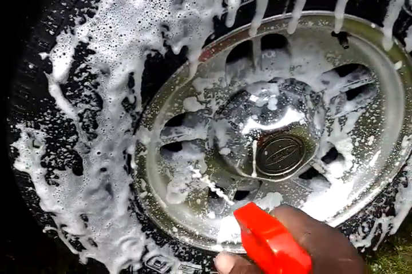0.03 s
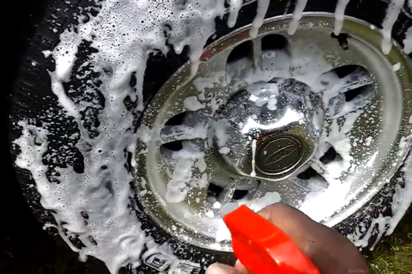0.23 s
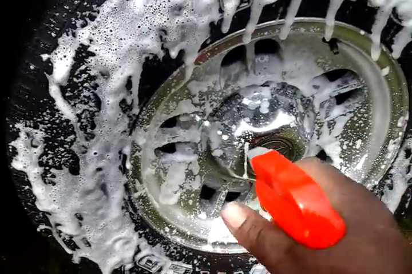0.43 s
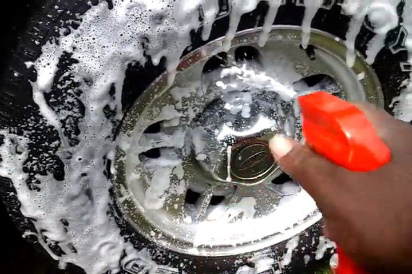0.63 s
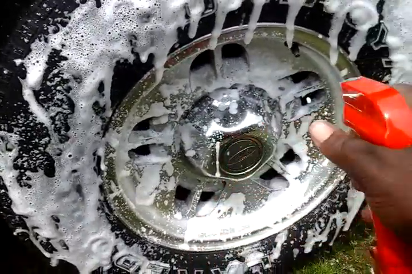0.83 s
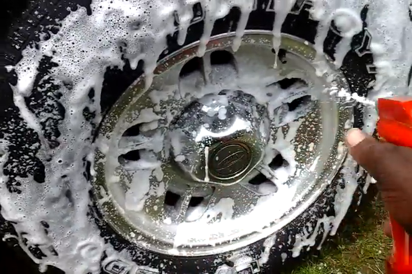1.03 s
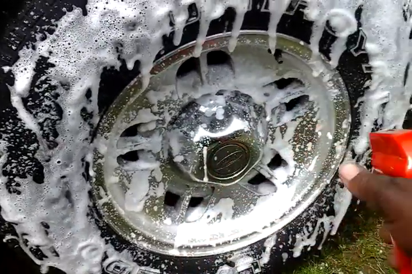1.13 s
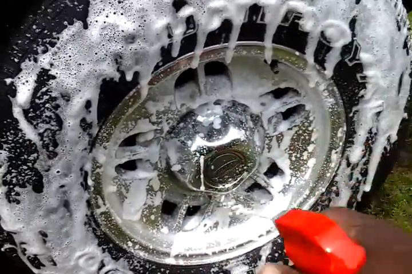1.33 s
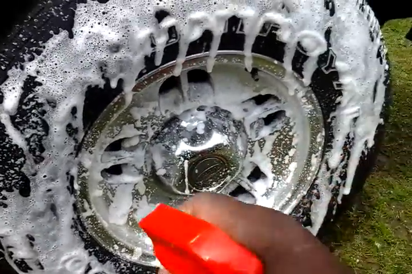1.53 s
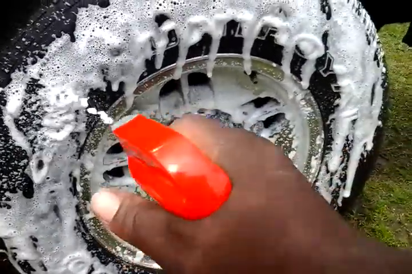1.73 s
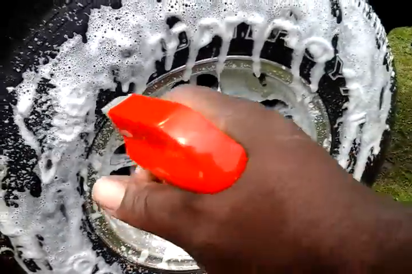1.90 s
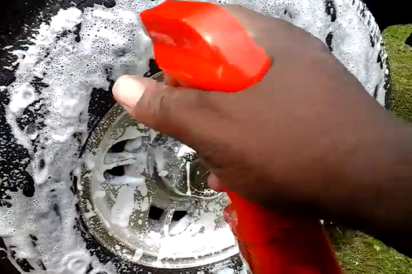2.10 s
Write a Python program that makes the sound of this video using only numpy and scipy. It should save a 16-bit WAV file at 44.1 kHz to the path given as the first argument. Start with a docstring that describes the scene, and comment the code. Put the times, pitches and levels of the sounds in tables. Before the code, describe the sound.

Seven short wet hisses from a hand spray bottle, the first already under way, each next one opened by crisp spits; small gurgles between, quiet open-air background, faint distant whistle, close stereo phone pickup.

```python
"""A hiss of foam is heard first, mid-stroke, over a soft outdoor wash, a low hum and a dying thump.
A trigger bottle is pumped about three times a second, outdoors, close to a phone with two unlike microphones.
Jets are random drops through resonances; valve spits and trigger knocks are short ringing noise bursts.
Between jets the pump sucks in bubbling liquid; far off, a thin whistle falls twice."""
import sys
import numpy as np
from scipy import signal
from scipy.fft import rfft, irfft, next_fast_len
from scipy.io import wavfile
from scipy.ndimage import uniform_filter1d, map_coordinates

SR = 44100
rng = np.random.default_rng(int(sys.argv[2]) if len(sys.argv) > 2 else 0)


def undo_db(level):
    """Turn decibels back into plain size, where 20 dB means ten times bigger."""
    steps = np.asarray(level, float) / 20
    return 10 ** steps


def generate_wav(sig):
    """Save sig (samples, or channels by samples) to the path in sys.argv[1] as 16-bit PCM at SR."""
    pcm = np.round(np.clip(np.atleast_2d(sig).T, -1, 1) * 32767).astype(np.int16)
    wavfile.write(sys.argv[1], SR, pcm)


N = 95256  # samples
T = np.arange(N) / SR  # s
SIDES = np.array([[.5], [-.5]])  # splits a left-over-right dB between the two sides


def unit(x):
    """Scale to rms 1."""
    return x / np.sqrt(np.mean(x ** 2) + 1e-20)


def along(points, hz):
    """Read a curve of (f/Hz, value) points on a log frequency axis."""
    f, value = np.transpose(points)
    return np.interp(np.log(hz + 1), np.log(f + 1), value)


def wobble(rate):
    """A smooth random curve through `rate` knots a second."""
    knots = rng.standard_normal(N // 8)[:int(N * rate / SR) + 4]
    return map_coordinates(knots, [T * rate])


def filtered(x, response):
    """Multiply the spectrum of x by a complex response of frequency."""
    size = next_fast_len(N + 8192)
    hz = np.fft.rfftfreq(size, 1 / SR)
    return irfft(rfft(x, size) * response(hz), size)[..., :N]


def ring(hz, width):
    """The response of one damped resonance, with centre and width in Hz."""
    return lambda f: 1j * f * width / (hz * hz - f * f + 1j * f * width)


def patchy(x, depth_db):
    """Random patches of gain over time and frequency, depth_db rms."""
    z = signal.stft(x, nperseg=256)[2]
    field = uniform_filter1d(rng.standard_normal(z.shape), 3, -2)  # across frequency
    field = uniform_filter1d(field, 16, -1)  # across time
    return unit(signal.istft(z * undo_db(depth_db * unit(field)), nperseg=256)[1][..., :N])


def grains(per_s, spread_db, channels=2):
    """Drops of uneven size at random moments; each channel gives them its own sign and weight."""
    size = (rng.random(N) < per_s / SR) * undo_db(spread_db * rng.standard_normal(N))
    return unit(size * rng.standard_normal((channels, N)))


def swell(start, length):
    """A soft rise and fall, half a sine long."""
    return np.sin(np.pi * np.clip((T - start) / length, 0, 1))


def echoed(x, t60_s):
    """The metal wheel and the ground answer at once: a dying noise tail, different on each side."""
    t = T[:2000]
    tail = rng.standard_normal((2, len(t))) * undo_db(-60 * t / t60_s)
    tail = tail / np.linalg.norm(tail, axis=1, keepdims=True)
    return signal.fftconvolve(x, tail, axes=1)[:, :N]


# The jet's course, one list per stroke, ahead of the microphones: t/s, jet level/dB
JETS = [
    [(0, -33), (.085, -28.5), (.115, -33.5), (.14, -45.5), (.158, -52)],
    [(.309, -49.5), (.344, -27), (.396, -25.5), (.454, -29), (.49, -45)],
    [(.638, -52), (.665, -31), (.71, -27), (.785, -34), (.835, -57.5)],
    [(.975, -34), (1.01, -29), (1.09, -31.5), (1.12, -40.5), (1.14, -57.5)],
    [(1.285, -45), (1.315, -27.5), (1.375, -28), (1.425, -36.5), (1.45, -45.5)],
    [(1.612, -51.5), (1.655, -29), (1.72, -28), (1.775, -34), (1.81, -50.5)],
    [(1.968, -52.5), (2.01, -32.5), (2.056, -29.5), (2.11, -33), (2.16, -50)],
]
# Each stroke's place and tone: left over right/dB, throaty part/dB, nozzle resonance/dB, top of the hiss/dB
STROKES = [(2, 2.5, -56, 10.5), (1.5, -8, -43, 6), (2.5, 2, -8, 8.5), (0.5, 1, -18, 8), (3.5, -1, -12, 7),
           (2, 4.5, -13, 8), (4.5, 4.5, -28.5, 9.3)]
# Tone of the hiss and of the throaty part: f/Hz, relative level per Hz/dB
HISS = [(2060, -23), (3500, -8.5), (4140, -9.5), (4570, -0.5), (8060, -4.5), (9300, -10), (13900, -14.5),
        (14900, -24), (15500, -95)]
THROAT = [(820, -75.5), (1400, -16.5), (1680, -18), (2120, -6), (4000, 2.5), (5200, -2.5), (8800, -120)]
THROAT_DB, THROAT_GROWS = -11.5, 0.88  # base level; dB of throat per dB of jet
TOP_GROWS, TOP_HZ = 0.052, 10240  # dB of top gain per dB of jet; where the top begins
NOZZLE_HZ, NOZZLE_WIDTH_HZ = 4900, 500
DROPS_PER_S, DROP_SPREAD_DB = 26000, 2.2
SPUTTER_DB, PATCHY_DB = 1.1, 3.5
SHARED_ANGLE, PATH_T60_S = .7, .008  # rad, share of hiss common to both sides; its short paths


def spray():
    """Drops tear out of the nozzle: more pressure is louder and brighter."""
    drops = patchy(grains(DROPS_PER_S, DROP_SPREAD_DB, channels=3), PATCHY_DB)
    hiss = unit(filtered(drops, lambda f: undo_db(along(HISS, f))))
    top = filtered(hiss, lambda f: 1 / (1 + (TOP_HZ / (f + 1)) ** 6))
    throat = unit(filtered(drops, lambda f: undo_db(along(THROAT, f))))
    nozzle = unit(filtered(drops, lambda f: ring(NOZZLE_HZ, NOZZLE_WIDTH_HZ)(f) ** 2))
    sputter = undo_db(SPUTTER_DB * wobble(150))
    out = np.zeros((2, N))
    for jet, (pan_db, throat_db, nozzle_db, top_db) in zip(JETS, STROKES):
        s, db = np.transpose(jet)
        # a steep start and end around the table's points
        s = np.r_[s[0] - .015, s, s[-1] + .02]
        db = np.r_[db[0] - 25, db, db[-1] - 25]
        level = np.interp(T, s, db, -150, -150)
        slack = level - db.max()  # dB, how far below the stroke's peak
        top_gain = undo_db(top_db + TOP_GROWS * slack)
        jet_sound = hiss + (top_gain - 1) * top + undo_db(nozzle_db) * nozzle
        body = undo_db(THROAT_DB + throat_db + db.max() + THROAT_GROWS * slack) * throat
        left, right, both = sputter * (undo_db(level) * jet_sound + body)
        own = np.cos(SHARED_ANGLE) * np.array([left, right])
        shared = np.sin(SHARED_ANGLE) * echoed([both, both], PATH_T60_S)  # new paths at each stroke
        out += undo_db(pan_db * SIDES) * (own + shared)
    return out


# Tone of the open-air wash: f/Hz, relative level per Hz/dB
WASH = [(15, -2), (30, -6.5), (80, 2), (198, -1), (1140, -5.5), (1450, -10.5), (2300, -7.5), (3720, -11),
        (5580, -10.5), (13900, -24), (15500, -37)]
# How alike the background is at the two microphones: f/Hz, left-right likeness (-1 to 1)
ALIKE = [(25, -0.57), (60, -0.99), (240, -0.7), (950, -0.3), (3770, -0.011), (15000, -0.18)]
WASH_DB, WASH_SWELL_DB = -53.5, 1.5
HUM_HZ, HUM_WIDTH_HZ, HUM_DB = 109.1, 29, -61
THUMP_DB, THUMP_S, THUMP_HZ = -43, .035, 150  # level at the start, time to fall to 1/e, centre


def outdoors():
    """Wash, hum and a dying thump of filtered noise; the two sides pull against each other in the bass."""
    def pair(colour):
        """Patchy noise as mid and side, shared out so that left and right are as alike as ALIKE says."""
        def response(f):
            angle = np.arccos(np.clip(along(ALIKE, f), -1, 1)) / 2
            return colour(f) * np.array([np.cos(angle), np.sin(angle)])
        return unit(filtered(patchy(rng.standard_normal((2, N)), 1.7), response))

    wash = undo_db(WASH_DB + WASH_SWELL_DB * wobble(3.7)) * pair(lambda f: undo_db(along(WASH, f)))
    hum = undo_db(HUM_DB + 2.7 * wobble(6)) * pair(lambda f: ring(HUM_HZ, HUM_WIDTH_HZ)(f) ** 2)
    thump = pair(lambda f: ring(THUMP_HZ, 2 * THUMP_HZ)(f) ** 2)
    thump = undo_db(THUMP_DB) * np.exp(-T / THUMP_S) * thump
    mid, side = wash + hum + thump
    return np.array([mid + side, mid - side])


# The pump refills, close by: start t/s, length t/s, level before the swell/dB, centre f/Hz
REFILLS = [(0.14, 0.16, -54.5, 3400), (0.477, 0.32, -52.5, 2400), (0.842, 0.091, -53.5, 2800),
           (1.197, 0.03, -53, 4440), (1.479, 0.082, -50.5, 2870), (1.84, 0.089, -51, 2610)]
REFILL_WIDTH = 1.1  # resonance width over its centre frequency
REFILL_BUBBLES_PER_S, REFILL_SPREAD_DB = 3500, 5


def refill():
    """Liquid and bubbles are drawn up the tube: random grains through one broad resonance."""
    bubbles = grains(REFILL_BUBBLES_PER_S, REFILL_SPREAD_DB)
    out = np.zeros((2, N))
    for start, length, db, hz in REFILLS:
        gurgle = unit(filtered(bubbles, lambda f: ring(hz, REFILL_WIDTH * hz)(f) ** 2))
        out += undo_db(db) * swell(start, length) * gurgle
    return out


LOW_CUT_HZ = 1150  # the near sounds thin out below this


def bursts(events, life_s, rings, top_hz):
    """Short dying bursts of noise into broad resonances; each sets its own share of the lowest."""
    t = T[:1500]
    drive = np.zeros((2, 2, N + SR))  # (lowest ring or the others, side, time)
    noises = rng.standard_normal((len(events), 2, len(t)))
    for (s, db, low_db), noise in zip(events, noises):
        burst = undo_db(db) * np.exp(-t / life_s) * noise / np.abs(noise[:, :40]).max()
        start = round(s * SR)
        drive[:, :, start:start + len(t)] += [undo_db(low_db) * burst, burst]

    def edges(f):
        return (1 + 1j * f / top_hz) ** -6 * (1 - 1j * LOW_CUT_HZ / 2 / (f + 1)) ** -4

    def rung(x, hz, width, db):
        return filtered(x, lambda f: undo_db(db) * ring(hz, width)(f) * edges(f))

    lowest = rung(drive[0, :, :N], *rings[0])
    return lowest + sum(rung(drive[1, :, :N], *r) for r in rings[1:])


# Valve spits, close by: t/s, peak level ahead of the rings/dB, share of the lowest ring/dB
SPITS = [(.293, -20.5, 15), (.2975, -16.5, 18.5), (.623, -19.5, 14), (.628, -22, 2), (.9535, -12.5, 7),
         (.958, -22, 29), (.963, -12, -16), (.970, -15.5, 23.5), (.975, -18, 19), (1.2, -32, 9),
         (1.22, -51, 0), (1.271, -22, 23), (1.274, -16.5, 22), (1.546, -38, -11), (1.596, -27, 24),
         (1.953, -23, -13), (1.957, -27.5, 26)]
# Resonances of a spit: f/Hz, width f/Hz, level/dB
SPIT_RINGS = [(2580, 660, -13.5), (5200, 2600, 2.5), (5960, 1070, 1.5), (8500, 600, -5)]
SPIT_S, SPIT_TOP_HZ = 0.004, 13500  # time to fall to 1/e; treble corner


def valve():
    """Sharp puffs of air and foam as the valve opens: noise bursts in bright resonances."""
    return bursts(SPITS, SPIT_S, SPIT_RINGS, SPIT_TOP_HZ)


# Trigger knocks, close by: t/s, peak level ahead of the rings/dB, share of the lowest ring/dB
KNOCKS = [(.5995, -21, -1), (.6013, -16, -9.5), (.6045, -25, -2), (1.561, -21, -26), (1.565, -18.5, -7),
          (1.9255, -25, -18), (1.9275, -23, -17)]
# Resonances of the plastic: f/Hz, width f/Hz, level/dB
KNOCK_RINGS = [(985, 290, 13), (2400, 1700, 0), (3310, 1380, 9.5), (5160, 1400, -26)]
KNOCK_S, KNOCK_TOP_HZ = 0.0028, 9750  # time to fall to 1/e; treble corner


def trigger():
    """Plastic knocks dryly on plastic as the trigger springs back: shorter, duller bursts."""
    return bursts(KNOCKS, KNOCK_S, KNOCK_RINGS, KNOCK_TOP_HZ)


# A thin whistle, far off: start t/s, length t/s, from f/Hz, to f/Hz, level before the swell/dB
CHIRPS = [(1.165, .04, 3150, 3100, -59), (1.75, .23, 3200, 3000, -56)]


def chirps():
    """A thin falling whistle far away: a sine gliding down with unsteady pitch and level."""
    out = np.zeros(N)
    for start, length, from_hz, to_hz, db in CHIRPS:
        hz = np.interp(T, [start, start + length], [from_hz, to_hz]) + 30 * wobble(80)
        tone = np.sin(2 * np.pi * np.cumsum(hz) / SR)
        out += undo_db(db + 2.5 * wobble(60)) * swell(start, length) * tone
    return out


# The two unlike microphones, heard on the near sounds: f/Hz, left over right level/dB
MICS = [(1000, 27), (1700, 8), (2800, 7), (4800, -3.5), (6000, -10), (8000, -7.5), (10000, -1.1),
        (14000, -5)]
WHEEL_T60_S, WHEEL_DB = .018, -8  # the wheel and ground answering the clicks


def scene():
    """The bottle close by, coloured differently on its way to each microphone, over the background."""
    clicks = trigger() + valve()
    answer = undo_db(WHEEL_DB) * echoed(clicks, WHEEL_T60_S)
    near = spray() + clicks + answer + refill()

    def microphones(f):
        return undo_db(along(MICS, f) * SIDES) / (1 + (LOW_CUT_HZ / (f + 1)) ** 6)

    return filtered(near, microphones) + chirps() + outdoors()


STARVE_DB, STARVE_DEPTH_DB = -10, -40  # threshold against the moment's mean power; gain of weak bands
STARVE_LOW_HZ, STARVE_HIGH_HZ = 60, 1600


def starved(x):
    """Low bands far below the loudness of the moment all but vanish; only the strongest survive."""
    hz, _, z = signal.stft(x, SR, nperseg=2048)
    power = np.abs(z) ** 2
    weak = power.mean(0) < undo_db(2 * STARVE_DB) * power.mean((0, 1))
    low = (hz[:, None] < STARVE_HIGH_HZ) & (hz[:, None] > STARVE_LOW_HZ)
    gain = np.where(weak & low, undo_db(STARVE_DEPTH_DB), 1)
    return signal.istft(z * gain, SR, nperseg=2048)[1][:, :N]


def top_cut(x):
    """Nothing passes above the cut-off."""
    return signal.sosfilt(signal.butter(12, 15840, fs=SR, output="sos"), x)


def record(dry):
    """The phone keeps few quiet low bands while the jet is loud."""
    mix = starved(dry)
    return top_cut(mix)


dry = scene()
out = record(dry)
generate_wav(out)
```